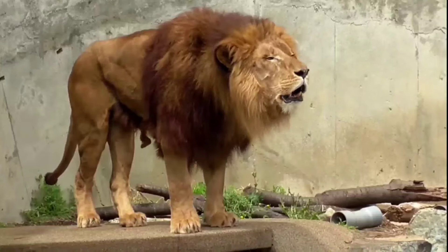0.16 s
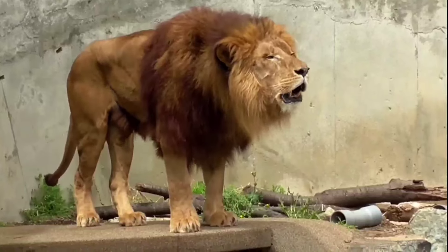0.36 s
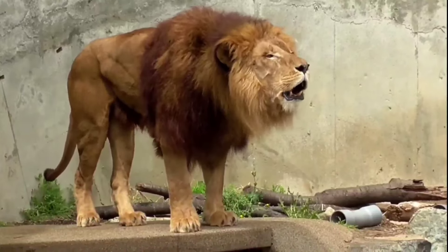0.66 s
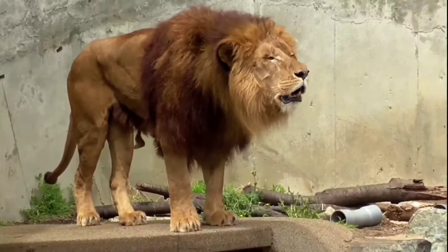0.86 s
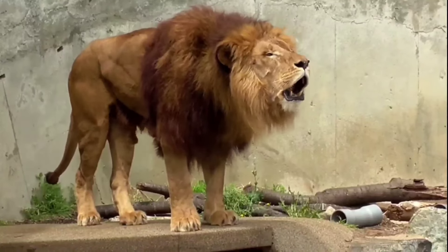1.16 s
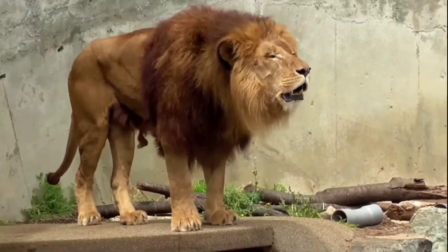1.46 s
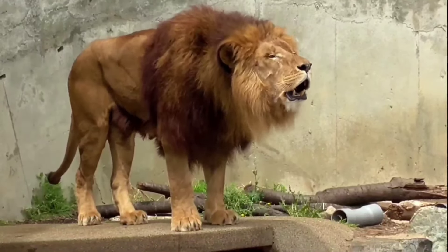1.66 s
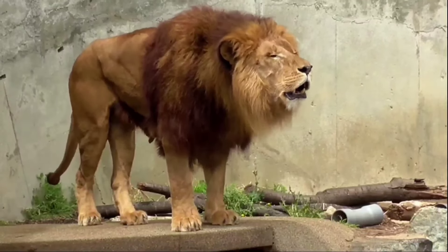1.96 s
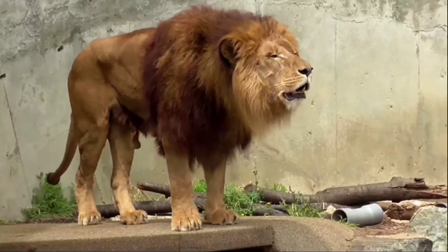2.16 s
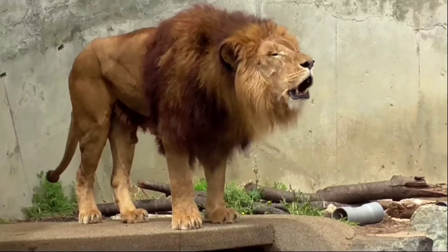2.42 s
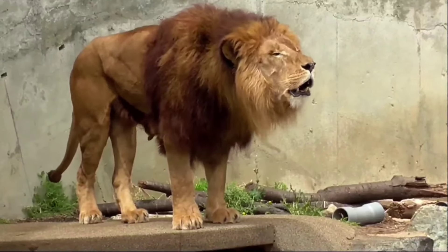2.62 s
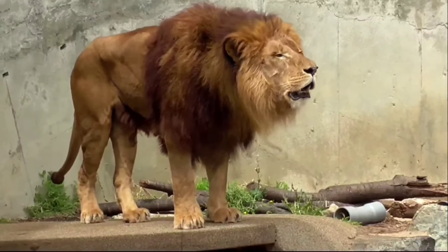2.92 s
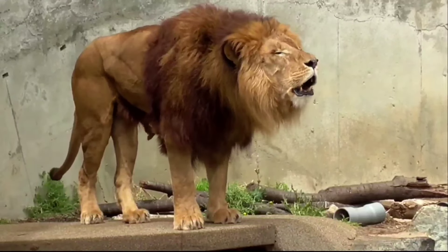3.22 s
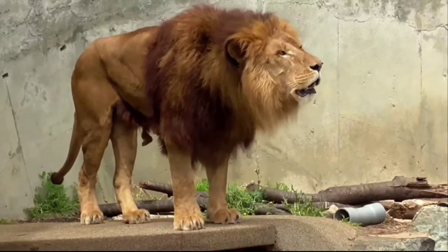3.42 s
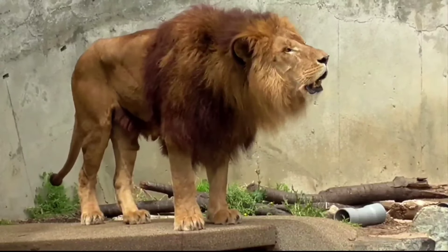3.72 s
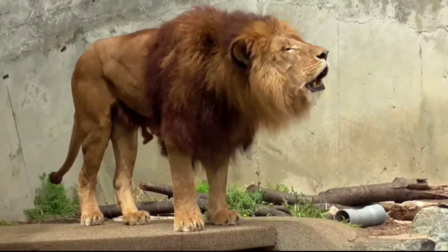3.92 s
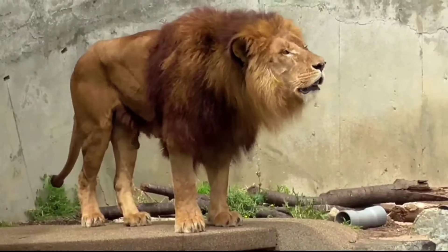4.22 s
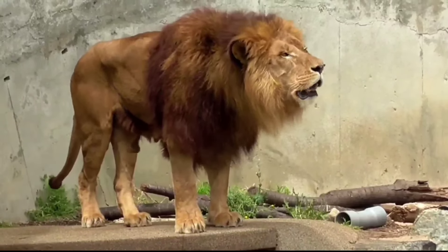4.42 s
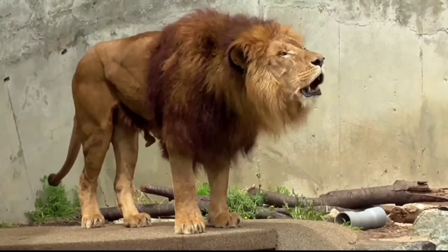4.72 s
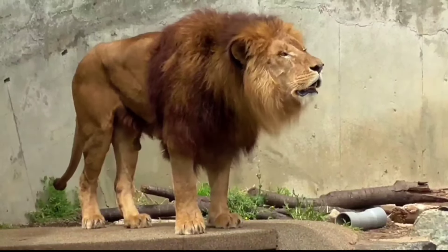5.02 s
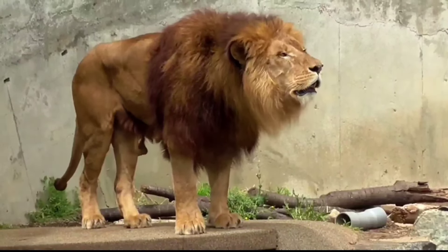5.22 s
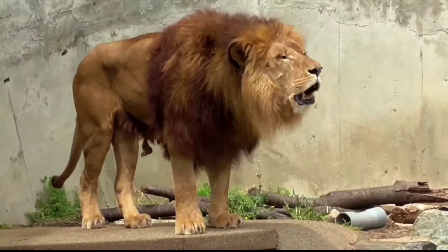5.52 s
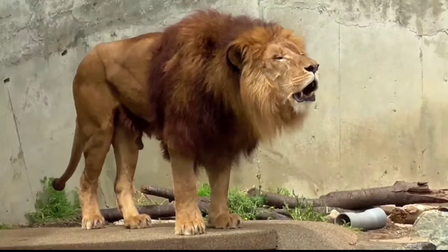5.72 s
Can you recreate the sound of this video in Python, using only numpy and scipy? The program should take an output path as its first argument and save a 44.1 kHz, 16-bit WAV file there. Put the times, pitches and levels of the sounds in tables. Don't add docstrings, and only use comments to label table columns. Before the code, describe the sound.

In a hard-walled zoo yard, a big lion repeats rough, chesty grunts with breathy edges, eight in six seconds, slowing slightly but staying loud. Walls return quick slaps, a low boom and a reverberant tail filling the gaps. Quiet open air, low wind, faint chirps and light rustling lie underneath. The stereo pickup is close, with peaks held down and soft treble.

```python
import sys
import numpy as np
from scipy import signal
from scipy.io import wavfile
from scipy.ndimage import uniform_filter1d, minimum_filter1d

SR = 44100
rng = np.random.default_rng(int(sys.argv[2]) if len(sys.argv) > 2 else 0)


def digitize_waveform(pressure):
    field = np.atleast_2d(pressure).T
    bounded = np.clip(field, -1, 1)
    quanta = np.round(bounded * 32767).astype(np.int16)
    wavfile.write(sys.argv[1], SR, quanta)


def voltage_ratio(level):
    return 10 ** (np.asarray(level, float) / 20)


N = 258955


def evened(x):
    return x / np.sqrt(np.mean(x ** 2) + 1e-20)


def read(points, hz):
    f, value = np.transpose(points)
    return np.interp(np.log(hz + 1), np.log(f + 1), value)


def add(mix, s, sound):
    part = mix[..., round(s * SR):][..., :sound.shape[-1]]
    part += sound[..., :part.shape[-1]]


def drift(size, per_s):
    span = max(int(SR / per_s), 1)
    return evened(uniform_filter1d(uniform_filter1d(rng.standard_normal(size), span), span))


def resonate(x, hz, width):
    turn = np.exp(2j * np.pi * np.cumsum(hz * np.ones(len(x))) / SR)
    r = np.exp(-np.pi * width / SR)
    once = signal.lfilter([1 - r], [1, -r], x / turn)
    twice = signal.lfilter([1 - r], [1, -r], once)
    return 2 * (turn * twice).real


def hiss(spectrum, patchy_db):
    # frequency in Hz, left-right likeness.
    likeness = [(60, -1.8), (180, 0.22), (540, 0.84), (1630, 0.34), (4910, 0.26), (14800, 0.1)]
    frames, hz = N // 128 + 5, np.fft.rfftfreq(512, 1 / SR)
    a, b, c, d, patches = rng.standard_normal((frames, len(hz), 5)).T
    patches = evened(uniform_filter1d(uniform_filter1d(patches, size=14, axis=0), size=8, axis=1))
    same = np.clip(read(likeness, hz), -1, 1)[:, None]
    left = a + 1j * b
    right = same * left + np.sqrt(1 - same ** 2) * (c + 1j * d)
    z = np.array([left, right]) * voltage_ratio(read(spectrum, hz)[:, None] + patchy_db * patches)
    return evened(signal.istft(z, nperseg=512, noverlap=384)[1][:, :N])


def hum(hz, level_db, waver_hz, waver_db):
    turns = np.cumsum(hz + waver_hz * drift(len(hz), 29.9)) / SR
    return np.sqrt(2) * voltage_ratio(level_db + waver_db * drift(len(hz), 46)) * np.sin(2 * np.pi * turns)


def outdoor_air():
    # frequency in Hz, density in dB per Hz.
    air_colour = [(60, -24), (110, -12), (170, 9), (240, -39), (360, 4.5), (560, -6), (720, -6), (1090, -6),
                  (1500, -23), (2500, -30.5), (9000, -38), (15200, -38.5)]
    return voltage_ratio(-43.5) * hiss(air_colour, patchy_db=-2.0)


def wind():
    # centre in seconds, lift in dB.
    thuds = [(.46, 8.9), (2.689, 9.8), (2.95, 8), (3.84, 11), (4.14, 7.9), (5.35, 9.4)]
    a, b = rng.standard_normal((2, N))
    lumps = voltage_ratio(-41 + 2.0 * drift(N, 5)) * evened(resonate(a, hz=55, width=90))
    t, half_s = np.arange(N) / SR, 0.033
    thud_db = sum(db * np.exp(-((t - s) / half_s) ** 2) for s, db in thuds)
    far = voltage_ratio(-42.5 + thud_db + 2.0 * drift(N, 8)) * evened(resonate(b, hz=111.2, width=54))
    return far + lumps * np.array([[1], [-1]])


def rustles():
    # start in seconds, level in dB, length in seconds.
    bursts = [
        (.003, -37, 0.0032),
        (.69, -65.5, 0.13),
        (1.877, -58.5, 0.17),
        (2.693, -52, 0.11),
        (4.665, -57, 0.033),
        (4.73, -62, 0.044),
        (5.749, -54.5, .06),
        (5.823, -60, 0.074),
    ]
    level = np.zeros(N)
    for s, db, length in bursts:
        u = np.arange(0, 2, 1 / (length * SR))
        add(level, s, voltage_ratio(db) * np.minimum(u * 12, 1) * np.exp(-u * 0.57))
    crackle = voltage_ratio(2.2 * drift(N, 150))
    colour = [(800, -26.0), (2000, 10.0), (6000, 1.5), (11000, -0.5), (15000, -8.0)]  # (Hz, dB per Hz)
    return level * crackle * hiss(colour, patchy_db=-3.5)


def birds():
    # start in seconds, level in dB, starting pitch in Hz, length in seconds, left over right in dB.
    chirps = [(0.048, -67, 3500, .012, 2), (0.086, -70, 4200, 0.033, 3), (0.134, -72, 4220, 0.021, 5),
              (0.688, -76, 3680, 0.011, 16), (0.696, -63, 4730, 0.012, 5), (0.706, -65, 3320, 0.011, 11),
              (0.747, -69, 3720, 0.029, 0), (0.78, -67, 3120, 0.024, 1), (1.936, -61, 3180, 0.0092, 2),
              (2.693, -59.5, 4070, 0.0085, -9), (4.654, -61, 4200, 0.018, 7), (4.669, -55, 4940, 0.012, 3),
              (4.686, -66, 3170, 0.014, 8), (4.724, -65, 4200, 0.018, 2), (4.738, -64, 5400, 0.017, 2),
              (4.75, -70, 3150, .04, 2), (5.773, -64, 4300, 0.018, 12), (5.785, -63, 4840, 0.014, 1),
              (5.788, -67, 3180, 0.015, 6), (5.831, -63, 2930, 0.018, 3), (5.834, -62, 5130, 0.022, -4)]
    out = np.zeros((2, N))
    for s, db, from_hz, length, pan_db in chirps:
        t = np.arange(0, length, 1 / SR)
        warble = 1 + 0.048 * np.sin(2 * np.pi * 130 * t) + .1 * drift(len(t), 900)
        hz = np.linspace(from_hz, .84 * from_hz, len(t)) * warble
        note = np.sin(2 * np.pi * np.cumsum(hz) / SR) * np.hanning(len(t))
        add(out, s, voltage_ratio(db - 1 + np.array([[pan_db / 2], [-pan_db / 2]])) * note)
    echo = rng.standard_normal((2, 3000)) * voltage_ratio(-60 * np.arange(3000) / SR / 0.13)
    return out + voltage_ratio(-14.5) * signal.fftconvolve(out, echo, axes=1)[:, :N]


def boom():
    # time in seconds, level in dB.
    steady = [(0, -24.5), (.16, -20), (.4, -27.5), (.64, -31), (.8, -21), (1.02, -39.5), (1.29, -32),
              (1.44, -25), (1.96, -31.5), (2.06, -27.5), (2.45, -33.5), (2.7, -30), (3.2, -34),
              (4.13, -32.5), (4.6, -39), (4.8, -37.5), (5.54, -33.5), (5.87, -52.5)]
    # centre in seconds, level in dB, pitch in Hz, half-length in seconds.
    swells = [(0.272, -13, 150.9, 0.028), (0.483, -18, 149, 0.056), (0.929, -14, 145.7, .03),
              (1.055, -19, 140.8, 0.017), (1.142, -16.5, 150.1, 0.042), (1.45, -26.5, 147.5, 0.0082),
              (1.534, -13.5, 145.1, 0.02), (1.674, -17, 137.1, 0.015), (1.748, -23.5, 149.6, 0.017),
              (2.097, -22.5, 139.5, 0.017), (2.17, -14.5, 146.8, 0.018), (2.302, -21, 144.1, 0.018),
              (2.372, -15, 148.1, 0.013), (2.447, -24.5, 147.2, 0.014), (2.833, -14.5, 143.1, 0.036),
              (2.966, -20.5, 134.9, 0.02), (3.05, -24, 136, 0.037), (3.525, -16, 144.7, 0.037),
              (3.663, -23.5, 140.4, 0.027), (3.74, -18.5, 139.7, 0.021), (4.218, -27, 148.8, 0.013),
              (4.283, -17, 141.5, 0.042), (4.41, -17, 135, 0.021), (4.48, -17.5, 142.9, 0.017),
              (4.553, -27, 137.3, 0.019), (5.005, -19, 159.5, 0.0079), (5.132, -14.5, 138.3, 0.015),
              (5.18, -23.5, 126.4, .025), (5.254, -16.5, 131.8, 0.012), (5.314, -24.5, 150.6, 0.011)]
    t = np.arange(N) / SR
    level = voltage_ratio(np.interp(t, *np.transpose(steady)))
    pull = level * 149
    for s, db, hz, half in swells:
        swell = voltage_ratio(np.maximum(db - 5 * ((t - s) / half) ** 2, -200))
        level, pull = level + swell, pull + swell * hz
    hz, db = pull / level, 20 * np.log10(level)
    fuzz = voltage_ratio(db - 14) * evened(resonate(rng.standard_normal(N), hz, width=45))
    wave = hum(hz, db - 1.5, waver_hz=1.52, waver_db=1.93) + fuzz
    return np.array([wave * voltage_ratio(.6), np.roll(wave, 11) * voltage_ratio(-.6)])


def controls(row, thump, breath):
    onset, top_db, hold, fall, _ = row
    breath_db, breath_hold, snap_db, murmur_db = breath
    thump_db, half, thump_hz, linger_db, linger_hz = thump
    lead_s, peak_s, thump_s = .045, .013, 0.019
    spent_db, breath_tail_s = 38, .08
    u = np.arange(-lead_s, hold + spent_db / fall + breath_tail_s, 1 / SR)
    lead_db = 474 * np.minimum(u - peak_s, 0)
    after = np.maximum(u - peak_s, 0)
    effort_db = top_db + lead_db - 17 * after - fall * np.maximum(u - hold, 0)
    snap = snap_db * (u > 0) * np.exp(-u / 0.0091)
    breath_db = breath_db + 0.68 * lead_db + snap - 53.2 * after - 96 * np.maximum(u - breath_hold, 0)
    murmur_fade = np.clip((u + 0.03) / 0.0066, 0, 1) * np.clip(1 - u / thump_s, 0, 1)
    murmur = voltage_ratio(murmur_db) * murmur_fade + 1e-6
    push = voltage_ratio(thump_db - 5.2 * ((u - thump_s) / half) ** 2)
    push_hz = thump_hz + 10.5 * np.clip((u - thump_s) / half, -2, 1)
    linger = voltage_ratio(linger_db - 78.5 * after) * np.clip(u / thump_s, 0, 1)
    chest = push + linger + murmur
    chest_hz = (push * push_hz + linger * linger_hz + murmur * 163.7) / chest
    return onset + u, effort_db, breath_db, chest_hz, 20 * np.log10(chest)


def vocal_folds(u, opened, per_s, pitch_hz):
    size = len(u)
    turns = opened * (1 + np.cumsum(opened * per_s * (1 + .12 * drift(size, 40))) / SR)
    flaps = np.diff(np.floor(turns), prepend=0) * voltage_ratio(2.0 * rng.standard_normal(size))
    puffs = 1.12 + np.exp(-(turns % 1) / 0.083)
    arch_hz = pitch_hz * (1 - 2.5 * np.clip(u - .09, -1, .22) ** 2) * (1 + .035 * drift(size, 90))
    buzz = np.diff(np.floor(np.cumsum(arch_hz) / SR), prepend=0) * voltage_ratio(3 * rng.standard_normal(size))
    noise = rng.standard_normal(size)
    return puffs, .4 * evened(flaps) + .65 * evened(puffs * buzz) + .3 * evened(puffs * noise)


def throat_and_mouth(drive, u, shortness, mouth_hz, rise, lift_db):
    # throat resonance in Hz, width in Hz, level in dB.
    pipes = [(309.6, 84, 1), (382, 50.5, -4), (458.7, 98, -4.5), (726, 169, -1.5), (1212, 140, -17),
             (1585, 253, -29), (2010, 150, -40), (2293, 110, -34), (2730, 170, -38.5)]
    # resonance in Hz, width in
    # Hz, level in dB.
    onset_rings = [(97, 13, -21), (2286, 102, -27)]
    early = np.exp(-np.abs(u) / 0.1)
    depth_db = lift_db - 1 + 8.5 * u
    jaw = shortness * (1 + 0.065 * (0.7 - early) + 0.021 * drift(len(u), 24.0))
    sag = .5 * np.clip(u - .07, 0, .16)
    throat = 0
    for k, (hz, width, db) in enumerate(pipes):
        bend = jaw - sag * (hz > 600) if hz < 1000 else 1
        throat = throat + (-1) ** k * voltage_ratio(db + depth_db * (hz < 450)) * resonate(drive, hz * bend, width)
    mouth_hz = mouth_hz + rise * (1 - np.exp(-np.maximum(u, 0) / 0.067))
    lips_hz = np.minimum(mouth_hz * 1.13, 1170)
    mouth = resonate(drive, mouth_hz * 0.9796, width=107)
    mouth = mouth - voltage_ratio(-0.5) * (1 - early) * resonate(drive, lips_hz, width=85)
    mouth = mouth + voltage_ratio(9) * min(rise / 100, 1) * early ** 2 * resonate(drive, mouth_hz, width=45)
    throat = evened(throat + voltage_ratio(-6.5 + 2.35 * early) * mouth)
    return throat + early * sum(voltage_ratio(db) * evened(resonate(drive, hz, width)) for hz, width, db in onset_rings)


def grunt(row, voicing, thump, breath):
    per_s, pitch_hz, shortness, mouth_hz, rise = voicing
    t, effort_db, breath_db, chest_hz, chest_db = controls(row, thump, breath)
    u = t - row[0]
    opened = np.clip(u / .003, 0, 1)
    puffs, drive = vocal_folds(u, opened, per_s, pitch_hz)
    throat = throat_and_mouth(drive, u, shortness, mouth_hz, rise, lift_db=row[-1])
    burst_db = -14 * (1 - opened) + 4 * opened * np.exp(-np.abs(u) / 0.0026)
    spent = np.clip((t[-1] - t) / .1, 0, 1) ** 2
    chest = spent * hum(chest_hz, chest_db - 5.5, waver_hz=5.8, waver_db=0.26)
    voice = voltage_ratio(effort_db + burst_db - 5) * throat + chest
    puffing = 1 + 0.22 * evened(puffs - puffs.mean())
    exhaled = voltage_ratio(breath_db + .85 * burst_db) * puffing * voltage_ratio(1.7 * drift(len(t), 130))
    edge = signal.windows.tukey(len(t), .08)
    return t[0], voice * edge, exhaled * edge


def yard(x):
    # delay in seconds, level in dB.
    echoes = [
        (.006, -17.5),
        (.013, -9),
        (0.023, -3.5),
        (.034, -9.5),
        (0.045, -7),
    ]
    # frequency in Hz, time to fall 60 dB in seconds.
    decay = [(100, 0.9), (260, 1.04), (700, 0.86), (1300, 0.83), (2000, 1.01), (8000, 0.5)]
    # frequency in Hz, width in Hz, lift in dB.
    rings = [(373, 43.6, 8.5), (430, 84, 9.5), (770, 160, -1.5), (1040, 30, 3)]
    taps = np.zeros((2, 2 * SR))
    jitter = rng.integers(0, 20, (2, (2 * SR - 1601) // 20))
    at = np.arange(1600, 2 * SR - 20, 20) + jitter
    np.put_along_axis(taps, at, rng.choice([-1., 1.], at.shape), 1)
    taps[1] = .8 * taps[0] + .6 * taps[1]
    hz, t, z = signal.stft(taps, SR, nperseg=1024)
    lift_db = sum(db / (1 + (2 * (hz - f) / width) ** 2) for f, width, db in rings)
    fall_db = 60 * t / read(decay, hz)[:, None]
    tail = signal.istft(z * voltage_ratio(lift_db[:, None] - fall_db), SR, nperseg=1024)[1]
    tail = voltage_ratio(-8.0) * tail / np.linalg.norm(tail[0])
    skew = rng.uniform(-.00018, .00018, len(echoes))
    for (s, db), lag in zip(echoes, skew):
        tail[0, round((s + lag) * SR)] += voltage_ratio(db)
        tail[1, round((s - lag) * SR)] += voltage_ratio(db)
    return signal.fftconvolve(x[None], tail, axes=1)


def lion():
    # onset in seconds, effort in dB, hold in seconds, fall in dB per second, deep throat lift in dB.
    grunts = [
        (.189, -12, 0.19, 131, -1.5),
        (0.837, -11.5, .13, 141, 0.1),
        (1.448, -11, 0.1, 129.5, -0.2),
        (2.076, -10.5, 0.098, 131, -0.1),
        (2.754, -11, .13, 140.5, 0.5),
        (3.44, -10.5, .11, 120, 0.2),
        (4.2, -10.5, 0.1, 129, 0),
        (5.006, -11, .12, 171.5, 2.1),
    ]
    # slow flaps per second, buzz pitch in Hz, throat shortness as a factor,
    # mouth resonance at the onset in Hz, its rise in Hz.
    voicings = [(34.4, 187.5, 1.008, 926, 151), (49.7, 184.7, 0.996, 940, 110),
                (31.62, 178.6, 0.965, 889, 165), (52.1, 180.4, 0.969, 895, 105),
                (33.87, 167.7, 0.972, 913, 70), (44.46, 167.8, 0.995, 914, 57),
                (37.94, 165.4, 0.97, 850, 52), (57.82, 163.3, 0.961, 867, 54)]
    # thump in dB, its half-length in seconds, its pitch in Hz,
    # lingering hum in dB, its pitch in Hz.
    thumps = [(-9, 0.0055, 178, -11, 199), (-10.5, .016, 188, -26, 186), (-10, 0.011, 185, -21.5, 220),
              (-16.5, 0.022, 190, -23, 220), (-3.5, 0.0075, 180, -26.5, 190), (-8, 0.014, 188, -43.5, 210),
              (-8.5, 0.0098, 185, -20, 230), (-15, 0.025, 182, -17.5, 190)]
    # breath in dB, hold in seconds, snap at the onset in dB, murmur before it in dB.
    breaths = [(-36.5, .24, -7.5, -26), (-37.5, 0.19, -0.5, -23.5), (-38.5, 0.18, -1, -26),
               (-38.5, .17, 11, -23.5), (-37, 0.18, -5, -20), (-39.5, 0.24, -6, -23.5),
               (-40, 0.23, 0, -21.5), (-38.5, 0.2, -6, -21)]
    # frequency in Hz, density in dB per Hz.
    breath_colour = [(1060, -45.5), (1800, -10), (2330, -7), (2530, -9.5), (3360, -9), (3850, -8.5),
                     (6400, -13), (8300, -9), (13600, -17), (15200, -29)]
    voice, breath = np.zeros(N + SR), np.zeros(N)
    s, sound, _ = grunt(grunts[0], voicings[0], thumps[0], breaths[0])
    add(voice, s + 1 - .64, voltage_ratio(-2.5) * sound)
    for rows in zip(grunts, voicings, thumps, breaths):
        s, sound, exhaled = grunt(*rows)
        add(voice, s + 1, sound)
        add(breath, s, exhaled)
    fade = np.exp(-1 / (0.015 * SR))
    breath = np.maximum(breath, signal.lfilter([1 - fade], [1, -fade], breath))
    direct = voice * voltage_ratio([[.2], [-.2]])
    wall = voltage_ratio(-5.0) * np.roll(resonate(voice, hz=956, width=320), 70) * [[0], [1]]
    voiced = (direct + wall + yard(voice)[:, :N + SR])[:, SR:]
    return voiced + breath * hiss(breath_colour, patchy_db=2.0)


def scene():
    return outdoor_air() + wind() + rustles() + birds() + boom() + lion()


def top_cut(x):
    return signal.sosfilt(signal.butter(12, 15380, fs=SR, output="sos"), x)


def record(dry):
    ceiling = .74
    room = minimum_filter1d(ceiling / np.maximum(abs(dry).max(0), ceiling), size=300)
    held = dry * uniform_filter1d(room, size=260)
    held = signal.oaconvolve(held, signal.firwin(255, 15380, fs=SR)[None], "same")
    mid, side = (held[0] + held[1]) / 2, (held[0] - held[1]) / 2
    mid = signal.sosfilt(signal.butter(2, 45, "high", fs=SR, output="sos"), mid)
    return top_cut(np.array([mid + side, mid - side]))


dry = scene()
out = record(dry)
digitize_waveform(out)
```